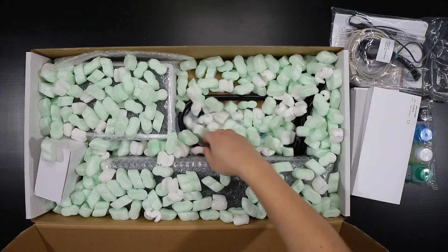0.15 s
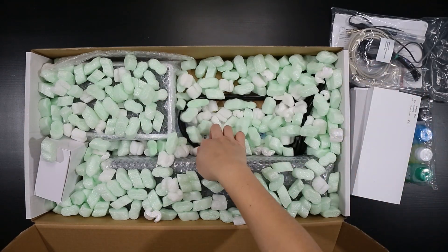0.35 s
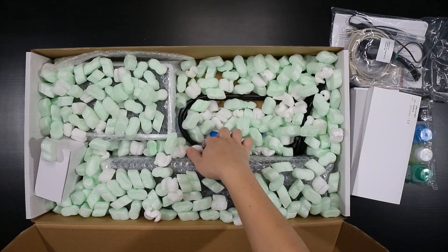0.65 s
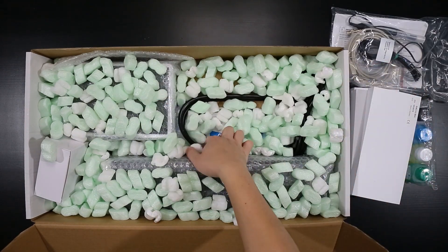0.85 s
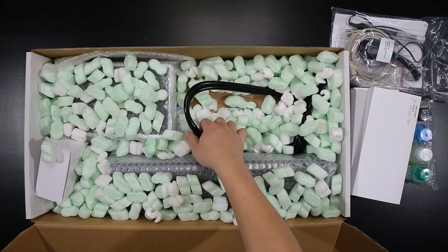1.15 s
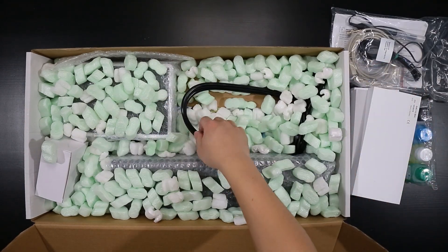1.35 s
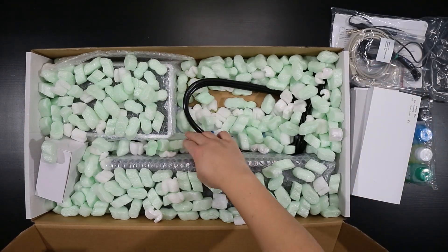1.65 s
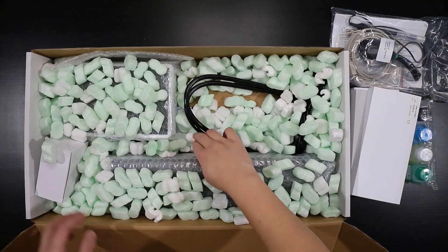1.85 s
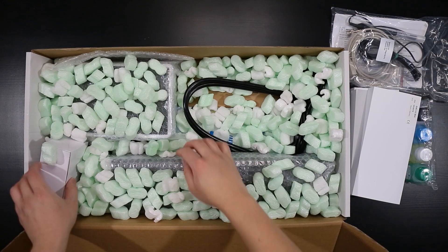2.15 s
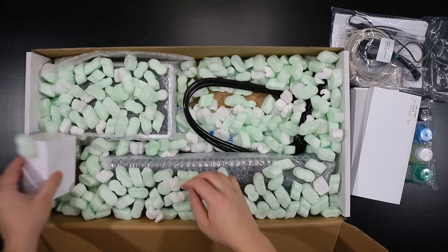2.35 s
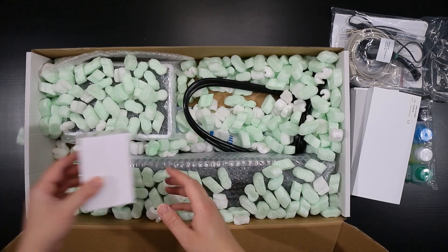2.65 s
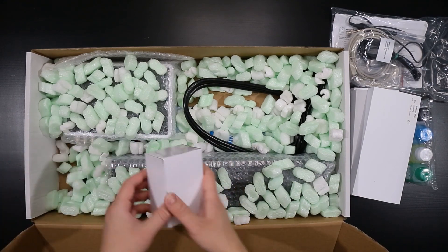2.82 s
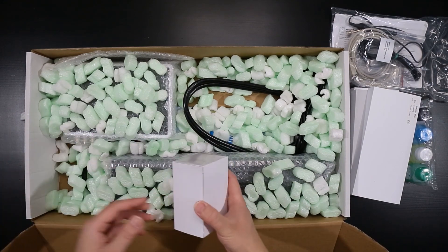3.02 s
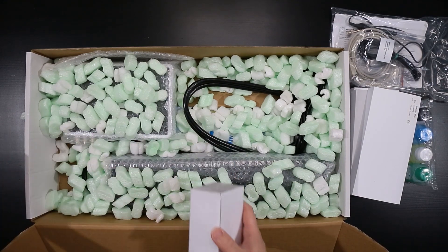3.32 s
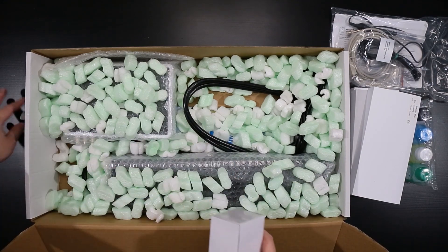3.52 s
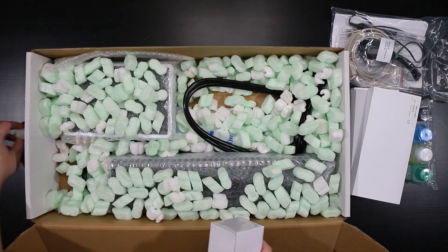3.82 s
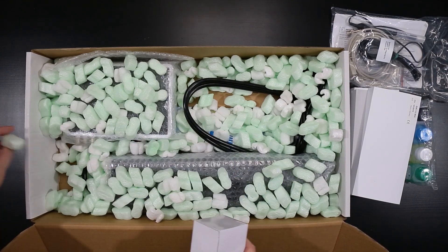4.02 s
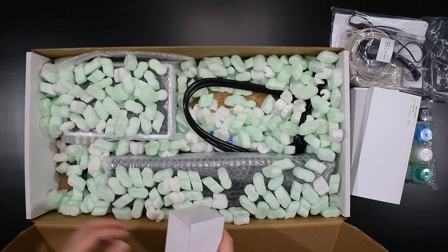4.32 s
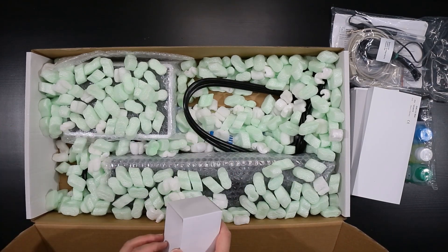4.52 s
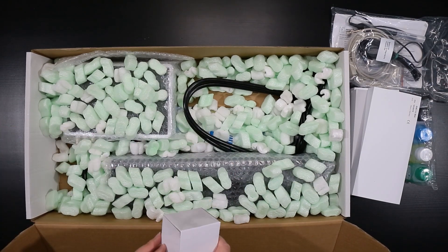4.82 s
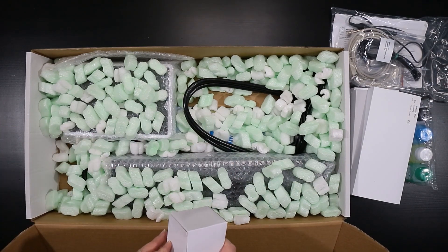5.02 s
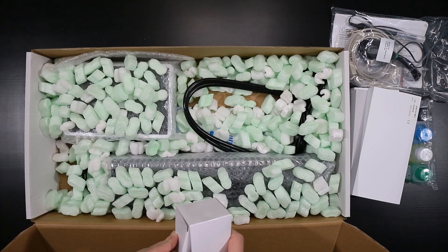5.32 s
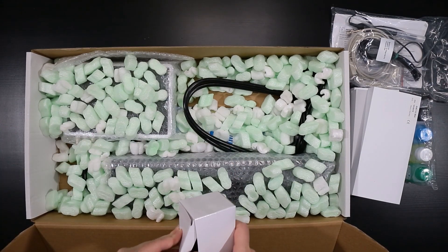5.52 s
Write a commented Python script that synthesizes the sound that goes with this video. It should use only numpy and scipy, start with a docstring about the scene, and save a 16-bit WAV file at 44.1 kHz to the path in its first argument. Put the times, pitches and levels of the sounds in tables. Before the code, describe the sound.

Close crunchy rustling of foam peanuts with dull cardboard bumps, then quiet handling of a small carton, soft thuds, light taps and a sharp flap pop.

```python
"""A small room, two close microphone ports: a low wavering hum, rumble and faint hiss lie under it all.
From 0.1 s a hand digs through foam peanuts in a cardboard box on a table: slips ring in the foam, edges
rasp, panels ring at each bump, and near 1.5 s a stiff cable ticks. From 2.9 s fingers tap a small carton
as it is lifted out. From 3.7 s the hand brushes the box and thuds on the table; the carton is turned over
and tapped, its flap pops at 5.1 s, the tab creaks, the flap pops again and the box takes a last bump."""
import sys
import numpy as np
from scipy import signal
from scipy.fft import rfft, irfft
from scipy.io import wavfile

SR = 44100
rng = np.random.default_rng(int(sys.argv[2]) if len(sys.argv) > 2 else 0)


def wrap_up_sound(samples):
    """Save the sound to the file named by the first command line argument, as 16-bit audio."""
    columns = np.atleast_2d(samples).T
    # keep every value between -1 and 1, then stretch to whole-number steps
    tamed = np.clip(columns, -1, 1)
    steps = np.round(tamed * 32767).astype(np.int16)
    wavfile.write(sys.argv[1], SR, steps)


N = 250174

# All source levels hold before panning, room and microphone; mode levels are relative.
# Colour of the still room: [f/Hz, relative level/dB per Hz]
ROOM_TONE = [(25, -18), (52, -23), (64, -6), (100, -11.5), (128, -7), (260, -15), (400, -21.5), (570, -30),
             (900, -34), (1800, -39.5), (10500, -46.5), (15000, -62.5)]
# Echoes of the small room: [f/Hz, t60/s, echo level/dB]
ROOM_ECHOES = [(150, 0.17, -13.5), (400, 0.39, -3.5), (830, 0.4, -2.5), (2000, 0.41, -5.5),
               (5100, 0.46, -4.5), (12600, 0.22, -2.5)]
# Phase between the microphone ports: [f/Hz, lead of left over right/rad]
PORT_LEAD = [(20, 1.5), (3500, -0.037), (6000, -1.05), (9800, -1.46), (15000, -2.2)]

# Stiff cable ticking against its neighbours: [t/s, peak level/dB, low-pass f/Hz]
CABLE_TICKS = [(1.4582, -29, 13100), (1.4601, -30, 13000), (1.5308, -43.5, 2980), (1.550, -50, 3000)]
# Modes of the cable: [f/Hz, width/Hz, level/dB]
CABLE_MODES = [(1533, 118, 4), (3405, 120, -5.5), (4860, 610, -4), (6530, 720, -11), (7220, 1300, -8)]

# Hand brushing past the outside of the box: [t of greatest speed/s, level/dB, rise/s, fall/s]
BOX_BRUSHES = [(3.682, -59.5, 0.011, 0.27), (3.815, -54, 0.08, 0.17), (3.95, -63, 0.1, 0.1),
               (4.06, -69, 0.028, 0.11)]
# Colour of skin on card: [f/Hz, relative level/dB per Hz]
SKIN_COLOUR = [(530, -12), (900, -20), (1050, -6), (1300, -13), (1630, -5), (3030, -10), (4280, -1),
               (10800, -3.5), (15500, -16)]
# Soft thuds on the table: [t/s, peak level/dB]
TABLE_THUDS = [(3.851, -41), (3.863, -34.5), (3.891, -37), (3.929, -44), (3.955, -53)]
# Modes of the table top: [f/Hz, width/Hz, level/dB]
TABLE_MODES = [(268.3, 40, 2.5), (370, 8, -21), (548, 13, -9.5)]

# Blows on the big box: [t/s, peak level/dB, centre f of the blow/Hz]
BOX_BLOWS = [(0.183, -37, 650), (0.395, -38, 780), (0.747, -43.5, 320), (0.76, -29.5, 264),
             (1.332, -43, 790), (1.622, -37.5, 690), (2.155, -32.5, 704), (5.412, -41, 380)]
# Modes of the box panels: [f/Hz, width/Hz, level/dB]
BOX_MODES = [(132, 32, 1.5), (272, 31, 2), (399, 93, -3), (493.2, 96, -2), (565, 77, 0), (704, 75, -2),
             (860, 100, -6), (1450, 380, -10.5), (1984, 53, -2)]

# Fingers sliding on the carton: [t of greatest speed/s, level/dB, rise/s, fall/s]
CARTON_SLIDES = [(4.75, -61, 0.061, 0.21), (5.31, -60, 0.25, 0.7), (5.41, -56, 0.3, 0.074),
                 (5.66, -57, 0.17, 0.2)]
# Colour of rubbed card: [f/Hz, relative level/dB per Hz]
CARD_COLOUR = [(240, -4), (400, -3), (644, -16), (880, -1.5), (2050, -6), (2420, -17), (2810, -15.5),
               (9650, -25), (14000, -50)]
# Fingers tapping and flicking the carton: [t/s, peak level/dB, low-pass f/Hz]
CARTON_TAPS = [(2.857, -44, 2500), (2.8701, -27.5, 4200), (2.983, -42, 2500), (2.997, -41.5, 3050),
               (3.025, -43, 2200), (4.523, -39.5, 4950), (4.538, -32, 4960), (4.749, -32, 4200),
               (5.131, -31, 4500)]
# Modes of the carton walls: [f/Hz, width/Hz, level/dB]
CARTON_MODES = [(870, 118, -0.5), (1330, 166, -5.5), (1636, 227, -0.5), (2430, 510, -6.5),
                (2740, 340, -3.5), (3720, 540, -9), (4800, 1300, -14.5), (7100, 1200, -10.5),
                (10000, 2800, -11)]
# Flap springing free: [t/s, peak level/dB, high-pass f/Hz]
FLAP_POPS = [(5.133, -18.5, 280), (5.3713, -30.3, 770)]
# Modes of the flap and the air behind it: [f/Hz, width/Hz, level/dB]
FLAP_MODES = [(331, 65, -1.5), (408, 46, 3.5), (494, 60, 0.5), (625, 64, 4), (785, 255, -1.5), (963, 93, 4),
              (1282, 180, -7), (1812, 110, -5), (2840, 340, -18)]
# Tuck tab creaking in its slot: [t/s, peak level/dB]
TAB_CREAKS = [(5.3116, -46), (5.329, -38.5), (5.336, -47), (5.345, -42), (5.3519, -46)]
# Modes of the tab: [f/Hz, width/Hz, level/dB]
TAB_MODES = [(2560, 97, 0.5), (4200, 220, -8), (7400, 450, -22)]

# Finger or edge dragged over foam or card: [t/s, length/s, level before the stroke's shape/dB, resonance f/Hz]
EDGE_SCRAPES = [(0.102, 0.058, -63.5, 3000), (0.962, 0.1, -59, 1450), (1.076, 0.036, -46.5, 10000),
                (1.211, 0.051, -55.5, 4070), (1.563, 0.048, -63.5, 1710), (1.983, 0.012, -61, 1880),
                (2.036, 0.13, -65.5, 1836), (2.29, 0.04, -65.5, 1770), (2.32, 0.0074, -59.5, 2000),
                (2.859, 0.03, -55.5, 1490), (2.884, 0.1, -61.5, 990), (3.728, 0.13, -66, 1040),
                (3.738, 0.075, -62, 1940), (4.115, 0.15, -80, 2640), (4.109, 0.17, -75, 9400),
                (5.364, 0.091, -67, 1750)]
# Foam or card giving way: [t/s, level at the top of the swell before colouring/dB]
FOAM_CRUNCHES = [(0.185, -37), (0.2653, -48), (0.397, -42.5), (0.746, -43.5), (0.763, -45), (1.594, -44.5),
                 (1.671, -38.5), (3.676, -65), (3.811, -53), (5.393, -53)]
# Single cracks of foam and wrap: [t/s, level of the sharp push before colouring/dB]
FOAM_SNAPS = [(0.2702, -30), (1.189, -47), (1.6229, -24), (1.63, -24.5), (1.7196, -32), (1.7844, -27),
              (1.8338, -39), (2.0467, -42), (2.7058, -43.5), (3.679, -37), (4.251, -60), (4.302, -55)]
# Colour of rubbed foam: [f/Hz, relative level/dB per Hz]
FOAM_COLOUR = [(590, -30), (1000, -13.5), (1270, -11), (1600, -10), (2310, -4.5), (3370, -1.5), (3910, 0.5),
               (5340, -3.5), (5920, -5.5), (6410, -4.5), (9250, -1.5), (11600, -4.5), (14500, -15),
               (15500, -35)]
# Colour of the pressed foam and the box below it: [f/Hz, relative level/dB per Hz]
PRESSED_COLOUR = [(180, -48), (300, -14.5), (382, -11.5), (679, -1.5), (1270, -7.5), (1450, -1.5),
                  (2200, -5.5), (2860, -31), (4840, -120)]
# Hand pushing through the foam, levels before it catches:
# [t of greatest speed/s, hiss level/dB, level of pressed foam and box/dB, rise/s, fall/s]
FOAM_PUSHES = [(0.103, -54.5, -80, 0.016, 0.13), (0.156, -48, -58.5, 0.01, 0.17),
               (0.19, -48, -50.5, 0.05, 0.093), (0.255, -53, -57, 0.056, 0.38),
               (0.397, -43, -54, 0.076, 0.047), (0.521, -46, -66.5, 0.046, 0.14),
               (0.763, -49, -50.5, 0.041, 0.095), (1.089, -43.5, -52, 0.13, 0.19),
               (1.335, -43, -48, 0.062, 0.075), (1.623, -39.5, -47, 0.036, 0.1),
               (1.68, -43, -49, 0.037, 0.19), (1.802, -42.5, -48.5, 0.06, 0.084),
               (1.84, -45.5, -47.5, 0.11, 0.039), (2.157, -51, -49.5, 0.029, 0.092),
               (2.423, -50.5, -62, 0.14, 0.096)]
# Hand staying among shifting peanuts, level before it catches: [start t/s, end t/s, hiss level/dB]
FOAM_RESTS = [(0.1, 1.41, -64.5), (1.6, 2.13, -66), (2.36, 2.9, -65)]

ROOM_TONE_DB, HUM_DB, HUM_HZ = -64.5, -68.0, 72.7
CUTOFF_HZ = 15750
SCATTER_DB = -5.5
FOAM_ROOM_DB, CABLE_ROOM_DB, BOX_ROOM_DB = -4, -10, -1.5  # how much of each reaches the room
REBOUND_S, REBOUND_DB, REBOUND_PITCH = 0.012, -8.5, 0.7  # delay, level change, pitch ratio
CRUNCH_SWELL_S = 0.0045
SETTLE_S = 0.051  # shifting starts and stops over this time
SLIPS_PER_S, SLIPS_FOLLOW = 22000, 0.4  # at the greatest speed; exponent on relative speed
CRACKLES_PER_S, CRACKLE_DB = 110, -17  # at the greatest speed; level against the hiss
CATCH_DB, CATCH_RATE_HZ = 0.72, 140  # spread and rate of the catching


def from_db(db):
    """Turn decibels into an amplitude factor."""
    return 10 ** (np.asarray(db) / 20)


def rms_one(x):
    """Scale a sound to unit effective level."""
    return x / np.sqrt(np.mean(x ** 2) + 1e-20)


def peak_one(x):
    """Scale a sound to unit peak."""
    return x / (np.abs(x).max() + 1e-20)


def at_hz(points, hz, axis=1):
    """Read a table's column on a log-frequency axis."""
    points = np.array(points)
    return np.interp(np.log(np.maximum(hz, 1)), np.log(points[:, 0]), points[:, axis])


def colour(x, spectrum):
    """Give a sound the spectrum, at unit power gain for white noise."""
    gain = from_db(at_hz(spectrum, np.fft.rfftfreq(N, 1 / SR)))
    return irfft(rfft(x) * rms_one(gain), N)


def cut(x, hz, kind, order=2):
    """Filter with a Butterworth low- or high-pass."""
    corner = np.clip(hz, 10, .45 * SR)
    return signal.sosfilt(signal.butter(order, corner, kind, fs=SR, output="sos"), x)


def drift(rate):
    """Slow chance with spread 1: noise through two equal poles, drawn once a millisecond."""
    step = SR // 1000
    r = np.exp(-2 * np.pi * rate / 1000)
    noise = rng.standard_normal(N // step + 502)
    slow = signal.lfilter([1], [1, -2 * r, r * r], noise)[500:]  # the run-in is dropped
    return np.interp(np.arange(N) / step, np.arange(len(slow)), rms_one(slow))


def add(out, s, sound):
    """Mix a sound in at time s."""
    i = int(np.clip(round(s * SR), 0, N - 1))
    out[i:i + len(sound)] += sound[:N - i]


def pan(x, right_db):
    """Place a sound between the channels by their level difference."""
    return x * from_db(np.array([[-right_db], [right_db]]) / 2)


def swells(strokes):
    """Amplitude of strokes: each gains 20 dB over its rise and loses 20 dB over its fall."""
    t = np.arange(N) / SR
    power = 0
    for s, db, rise, fall in strokes:
        drop_db = 20 * np.maximum((s - t) / rise, (t - s) / fall)
        power = power + from_db(db - drop_db) ** 2
    return np.sqrt(power + 1e-18)


def slips(per_s, spread_db, size=N):
    """Tiny slips at random moments; the wider the spread, the fewer strong ones stand out."""
    strength = from_db(spread_db * np.minimum(rng.exponential(1, size), 4))
    sizes = strength * rng.standard_normal(size)
    return sizes * (rng.random(size) < per_s / SR)


def contact(scuff, scuff_s):
    """A sharp push followed by a scuff that swells and dies."""
    age = np.arange(SR // 4) / SR / scuff_s
    noise = rng.standard_normal(len(age)) * np.sqrt(age) * np.exp(-age)
    return (age == 0) + scuff * noise / np.linalg.norm(noise) + 1e-18


def body(force, modes, vary_db):
    """Parallel resonances; each blow lands elsewhere and weights them anew."""
    out = 0
    for k, (hz, width, db) in enumerate(modes):
        r = np.exp(-np.pi * width / SR)
        poles = [1, -2 * r * np.cos(2 * np.pi * hz / SR), r * r]
        ring = signal.lfilter([1, 0, -1], poles, force) * (1 - r * r) / 2
        weight = from_db(db + vary_db * rng.standard_normal())
        out = out + (-1) ** k * weight * ring
    return out


def background():
    """Room rumble and faint hiss with a wavering low hum, stronger on the right."""
    own = rng.standard_normal((2, N))
    shared = rng.standard_normal(N)
    noise = rms_one(colour(own + 0.75 * shared, ROOM_TONE))
    phase = 2 * np.pi * HUM_HZ * np.arange(N) / SR
    hum = np.array([drift(5.7) * np.sin(phase) + drift(6.3) * np.cos(phase) for port in range(2)])
    return pan(from_db(ROOM_TONE_DB) * noise, right_db=3.5) + pan(from_db(HUM_DB) * hum, right_db=10.0)


def room(x):
    """Diffuse echoes, partly shared by both sides, that build up and die octave by octave."""
    size = SR * 3 // 4
    t, hz = np.arange(size) / SR, np.fft.rfftfreq(size, 1 / SR)
    alike = 0.55  # share of echo power common to both sides
    mid, left, right = rfft(rng.standard_normal((3, size)))
    white = np.sqrt(alike) * mid + np.sqrt(1 - alike) * np.array([left, right])
    echoes = 0
    for centre in 125 * 2 ** np.arange(8):
        share = np.maximum(1 - np.abs(np.log2((hz + 1) / centre)), 0)
        decay = np.exp(-np.log(1000) * t / at_hz(ROOM_ECHOES, centre))
        fade = decay * (1 - np.exp(-t / 0.00067))
        band = irfft(white * share, size) * fade / np.linalg.norm(fade)
        echoes = echoes + from_db(at_hz(ROOM_ECHOES, centre, axis=2)) * band
    return signal.fftconvolve(x, echoes, axes=1)[:, :N]


def scatter(x):
    """Short waves glance off nearby surfaces and reach each port by paths of their own."""
    t = np.arange(SR // 40) / SR
    paths = rng.standard_normal((2, len(t))) * np.exp(-t / 0.0035)
    # Only the phase is kept, so that no pitch is favoured; then the second half is dropped
    paths = irfft(np.exp(1j * np.angle(rfft(paths))), len(t))[:, :len(t) // 2]
    glanced = signal.oaconvolve(x, paths, axes=1)[:, :N]
    return from_db(SCATTER_DB) * cut(glanced, 3200, "high", order=3)


def ticking():
    """Brief rough contacts ring the cable, which is too thin to radiate low notes."""
    out = np.zeros(N)
    for s, db, hz in CABLE_TICKS:
        force = cut(contact(scuff=1.1, scuff_s=.0013), hz, "low")
        ring = body(force, CABLE_MODES, vary_db=3.0)
        add(out, s, from_db(db) * peak_one(cut(ring, 1460, "high", order=4)))
    return out


def beside_box():
    """A hand brushes past the box in tiny slips and comes down softly on the ringing table."""
    brushing = rms_one(colour(slips(5000, spread_db=3.0), SKIN_COLOUR))
    out = swells(BOX_BRUSHES) * brushing
    for s, db in TABLE_THUDS:
        force = cut(contact(scuff=0.21, scuff_s=0.0036), 610, "low")
        add(out, s, from_db(db) * peak_one(body(force, TABLE_MODES, vary_db=2)))
    return out


def box_bumps():
    """Things shoved against the box drop back; each blow favours the panels near its own pitch."""
    out = np.zeros(N)
    # What was shoved drops back, softer and duller
    rebounds = [(s + REBOUND_S, db + REBOUND_DB, hz * REBOUND_PITCH) for s, db, hz in BOX_BLOWS]
    for s, db, hz in list(BOX_BLOWS) + rebounds:
        push = contact(scuff=.45, scuff_s=.005)
        force = cut(cut(push, hz * 1.9, "low"), hz * 0.61, "high", order=4)
        add(out, s, from_db(db) * peak_one(body(force, BOX_MODES, vary_db=1.0)))
    return out


def carton():
    """Fingers slide and tap on thin card, the tab creaks and the flap pops, each ringing its modes."""
    fibres = slips(5000, spread_db=2)
    out = swells(CARTON_SLIDES) * rms_one(cut(colour(fibres, CARD_COLOUR), 390, "high"))
    for s, db, hz in CARTON_TAPS:
        force = cut(contact(scuff=.9, scuff_s=.0013), hz, "low", order=1)
        add(out, s, from_db(db) * peak_one(body(force, CARTON_MODES, vary_db=0.5)))
    for s, db, hz in FLAP_POPS:
        force = cut(contact(scuff=.25, scuff_s=.002), hz, "high")
        add(out, s, from_db(db) * peak_one(body(force, FLAP_MODES, vary_db=1.0)))
    for s, db in TAB_CREAKS:
        force = contact(scuff=0.78, scuff_s=0.0032)
        add(out, s, from_db(db) * peak_one(body(force, TAB_MODES, vary_db=3)))
    return out


def scraping():
    """A dragged edge bites, then rasps in a resonance and a weaker one about an octave up."""
    out = np.zeros(N)
    for s, length, db, hz in EDGE_SCRAPES:
        t = np.arange(int(length * SR)) / SR
        stroke = (1 + 0.71 * np.exp(-t / 0.0034)) * np.sqrt(1 - t / length)
        modes = [(hz, hz * 0.13, 0), (hz * 2.1, hz * .25, -10)]
        rasp = body(slips(4000, spread_db=1, size=len(t)), modes, vary_db=0)
        add(out, s, from_db(db) * rms_one(cut(rasp, hz * 0.54, "high")) * stroke)
    return out


def crunching():
    """Bursts of slips swell and die as a peanut gives way; a snap is one abrupt crack."""
    bursts, cracks = np.zeros(N), np.zeros(N)
    age = np.arange(SR // 8) / SR / CRUNCH_SWELL_S
    swell = age * np.exp(1 - age)
    for s, db in FOAM_CRUNCHES:
        burst = rms_one(slips(9000, spread_db=0.0, size=len(age)))
        add(bursts, s, from_db(db) * burst * swell)
    for s, db in FOAM_SNAPS:
        add(cracks, s, from_db(db) * contact(scuff=3.5, scuff_s=.0008))
    return colour(bursts + cracks, FOAM_COLOUR)


def peanuts(per_s, shifting_db):
    """Slips ring briefly in peanuts of many sizes, which take turns in touching."""
    out, pitches = 0, np.geomspace(1000, 15500, 18)
    for hz in pitches:
        # Dividing by the root of the rate keeps the power even
        grains = slips(per_s / len(pitches), spread_db=0.35) / np.sqrt(per_s)
        touching = from_db(shifting_db * drift(14))
        out = out + body(grains, [(hz, hz / 6, 0)], vary_db=0) * touching
    return out


def stirring():
    """Faster sliding gives more slips and lone crackles; pressure couples pushes into the box."""
    t, pushes = np.arange(N) / SR, np.array(FOAM_PUSHES)
    resting = 0
    for start, end, db in FOAM_RESTS:
        presence = np.clip(np.minimum(t - start, end - t) / SETTLE_S + .5, 0, 1)
        resting = resting + from_db(db) * presence
    speed = np.hypot(swells(pushes[:, [0, 1, 3, 4]]), resting)
    pressure = swells(pushes[:, [0, 2, 3, 4]])
    activity = (speed / speed.max()) ** SLIPS_FOLLOW
    rustle = peanuts(SLIPS_PER_S * activity, shifting_db=2.6)
    hiss = rms_one(colour(rustle, FOAM_COLOUR)) * speed
    pressed = rms_one(colour(slips(2500, spread_db=2.0), PRESSED_COLOUR)) * pressure
    # Lone peanuts jump free
    jumps = slips(CRACKLES_PER_S * activity, spread_db=1.0)
    crackle = from_db(CRACKLE_DB) * rms_one(colour(jumps, FOAM_COLOUR)) * speed
    # The foam catches and lets go; the offset lowers the average level
    catching = from_db(CATCH_DB * (drift(CATCH_RATE_HZ) - 2.5))
    return catching * (hiss + pressed + crackle)


def scene():
    """Close sources reach two ports; the box walls keep some foam and cable sound from the room."""
    foam = pan(stirring() + crunching() + scraping(), right_db=1.5)
    cable = pan(ticking(), right_db=2.5)
    box = pan(box_bumps() + beside_box(), right_db=3.0)
    held = pan(carton(), right_db=1.5)
    near = foam + cable + box + held
    # Each port takes half of the phase lead, with opposite signs
    phase = at_hz(PORT_LEAD, np.fft.rfftfreq(N, 1 / SR))
    lead = np.exp(.5j * np.outer([1, -1], phase))
    direct = irfft(rfft(near) * lead, N)
    escaping = from_db(FOAM_ROOM_DB) * foam + from_db(CABLE_ROOM_DB) * cable
    escaping = escaping + from_db(BOX_ROOM_DB) * box + held
    return direct + scatter(near) + room(escaping) + background()


def record(dry):
    """A steep elliptic low-pass cuts the top."""
    return signal.sosfilt(signal.ellip(10, .1, 80, CUTOFF_HZ, fs=SR, output="sos"), dry)


dry = scene()
out = record(dry)
wrap_up_sound(out)
```